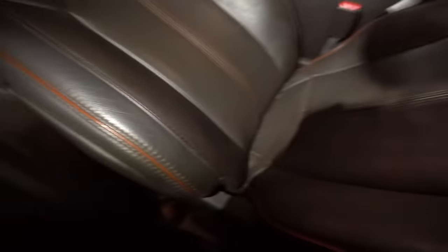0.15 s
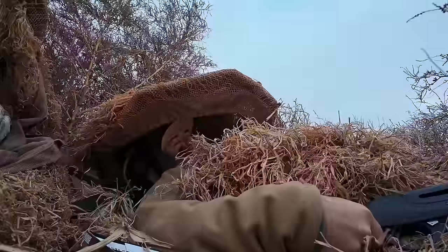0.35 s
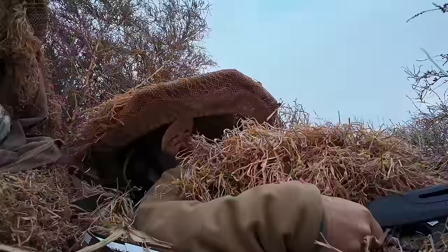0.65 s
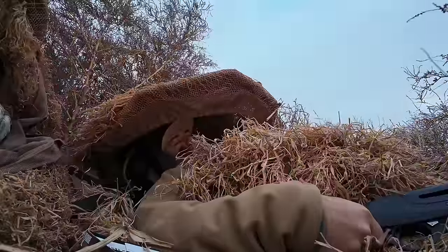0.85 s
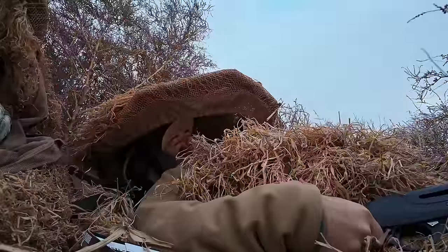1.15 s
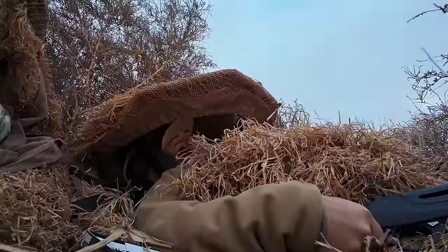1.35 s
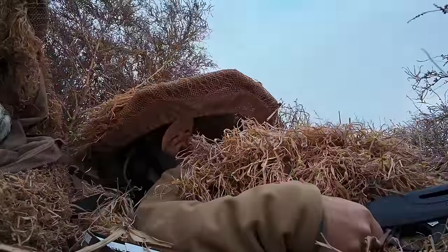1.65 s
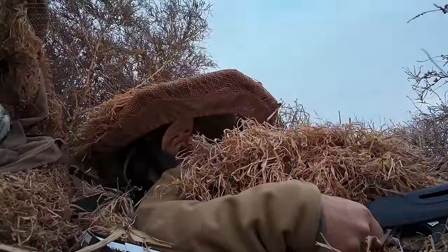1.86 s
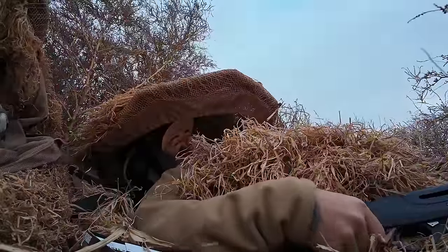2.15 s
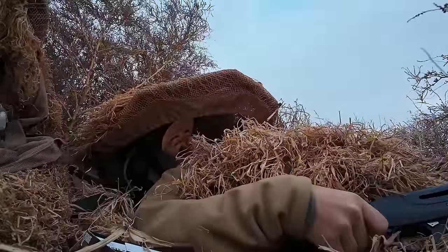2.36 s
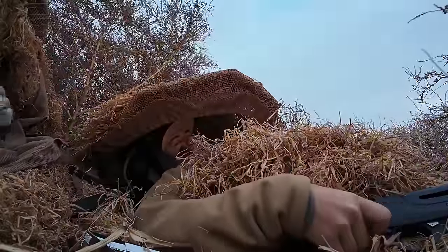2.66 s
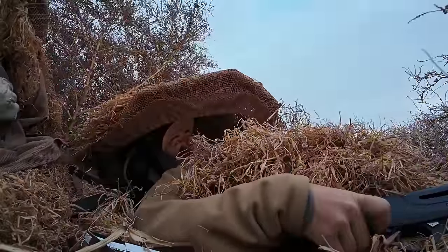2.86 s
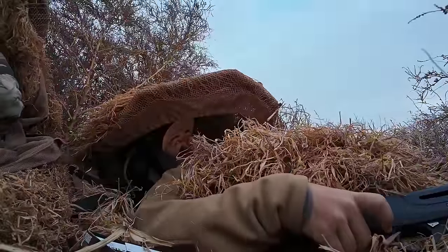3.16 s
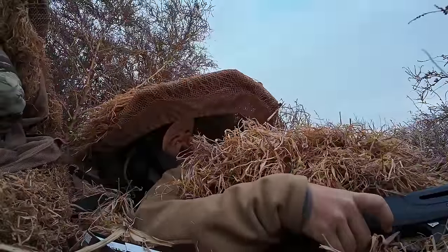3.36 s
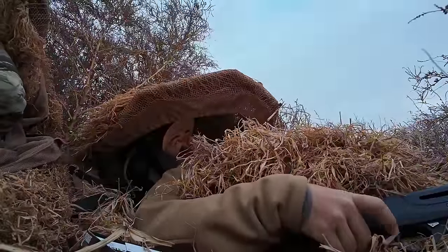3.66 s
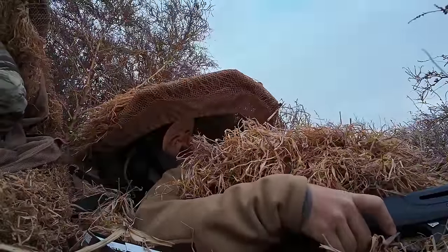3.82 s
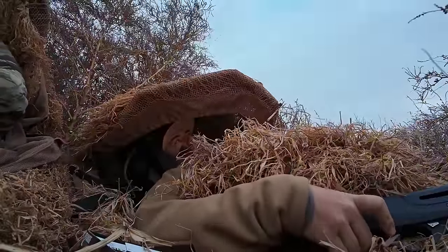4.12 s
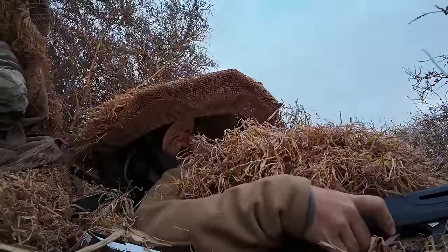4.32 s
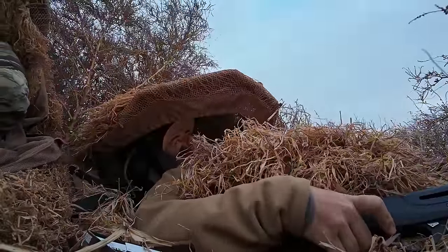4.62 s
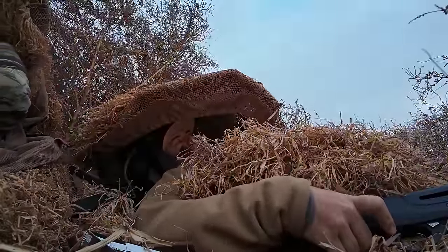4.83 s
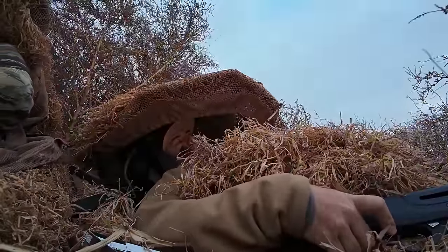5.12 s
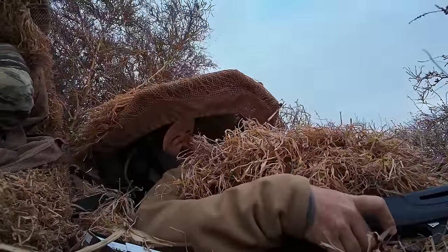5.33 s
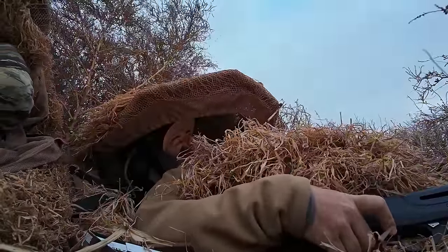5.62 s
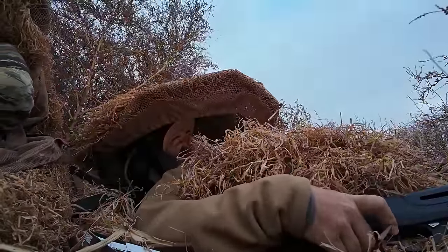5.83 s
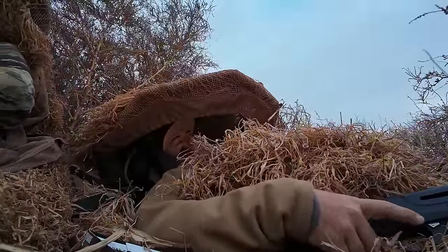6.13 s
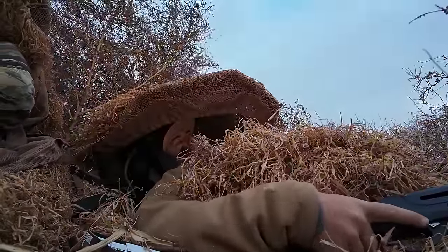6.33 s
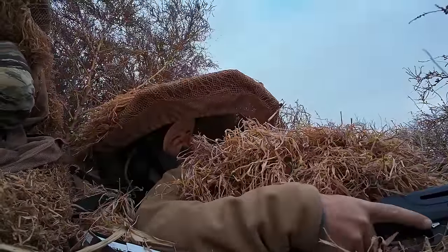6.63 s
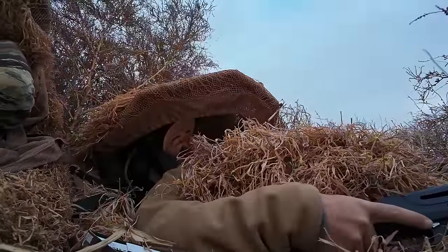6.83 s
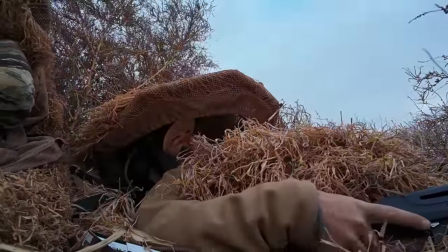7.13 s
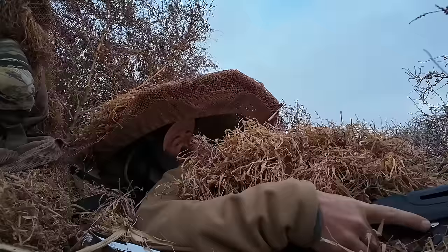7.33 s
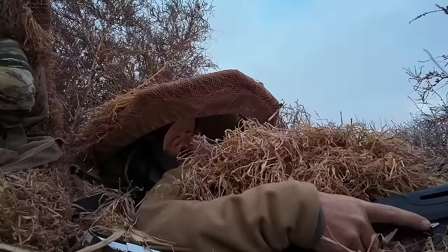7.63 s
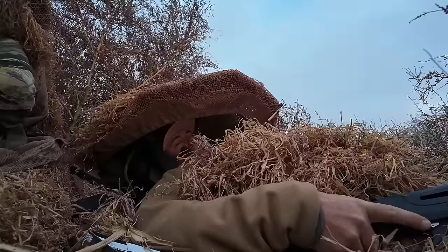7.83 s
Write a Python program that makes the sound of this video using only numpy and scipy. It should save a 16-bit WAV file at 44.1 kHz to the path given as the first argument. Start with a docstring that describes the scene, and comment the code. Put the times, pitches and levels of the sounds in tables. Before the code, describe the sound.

Large cranes rattle and bugle across an open field, with dry straw rustling close by and light wind rumbling on the microphone.

```python
"""Cranes rattle and bugle across an open field, heard from a straw-covered hide in light wind.
A rattle is a string of beats from the windpipe; held bugle notes end calls, and two young birds peep.
Dry straw rubs and snaps close to a two-port microphone, and gusts buffet it over a deep rumble.
The first quarter second is another place, hollow and hissing, with dull thuds; it cuts off abruptly."""
import sys
import numpy as np
from scipy import signal
from scipy.fft import rfft, irfft, next_fast_len
from scipy.io import wavfile
from scipy.ndimage import uniform_filter1d

SR = 44100
rng = np.random.default_rng(int(sys.argv[2]) if len(sys.argv) > 2 else 0)


def put_to_file(sound):
    """Save the sound as 16-bit audio at rate SR, in the file named by the first command-line argument."""
    columns = np.atleast_2d(sound).T  # one column per channel
    safe = np.clip(columns, -1, 1)
    whole_steps = np.round(safe * 32767)
    wavfile.write(sys.argv[1], SR, whole_steps.astype(np.int16))


N = 351918


def gain_of(db):
    """Decibels to an amplitude factor."""
    return 10 ** (np.asarray(db) / 20)


def unit_rms(x):
    """Scales to rms 1."""
    return x / np.sqrt(np.mean(x ** 2) + 1e-20)


def add(mix, start_s, sound):
    """Mixes a sound in from start_s on."""
    part = mix[..., round(start_s * SR):][..., :sound.shape[-1]]
    part += sound[..., :part.shape[-1]]


def filtered(x, hz, kind):
    """Second-order Butterworth filter."""
    return signal.sosfilt(signal.butter(2, hz, kind, fs=SR, output="sos"), x)


def fader(rows, column):
    """One dB column of a timed table as a gain, silent outside its span."""
    rows = np.array(rows)
    return gain_of(np.interp(np.arange(N) / SR, rows[:, 0], rows[:, column], -200, -200))


def stereo_noise(spectrum, frame, patchy_db):
    """Noise of a given spectrum with drifting louder patches, partly alike left and right."""
    # Each row: frequency in Hz, left-right correlation.
    correlation = [(25, 0.94), (150, 0.97), (600, 0.69), (2000, 0.75), (5000, 0.45), (12000, 0.64)]
    hz = np.fft.rfftfreq(frame, 1 / SR)

    def per_bin(rows):
        row_hz, values = np.array(rows).T
        return np.interp(np.log(hz + 1), np.log(row_hz + 1), values)[:, None]

    a, b, c, d, patches = rng.standard_normal((5, len(hz), N * 4 // frame + 5))
    patches = unit_rms(uniform_filter1d(uniform_filter1d(patches, size=10, axis=0), size=8, axis=1))
    alike = np.clip(per_bin(correlation), 0, 1)
    left = a + 1j * b
    right = alike * left + np.sqrt(1 - alike ** 2) * (c + 1j * d)
    in_band = ((hz >= spectrum[0][0]) & (hz <= spectrum[-1][0]))[:, None]
    bins = np.array([left, right]) * in_band * gain_of(per_bin(spectrum) + patchy_db * patches)
    return unit_rms(signal.istft(bins, nperseg=frame, noverlap=frame * 3 // 4)[1][:, :N])


def wind():
    """Deep rumble, gusts on the microphone and the faint wash of the open field."""
    # Each row: time in seconds, rumble level in dB, gust level in dB.
    levels = [(.26, -55, -49), (.82, -56, -54.5), (1.35, -58.5, -51), (1.6, -56.5, -54), (2.2, -56.5, -58),
              (2.4, -50, -44), (2.6, -56, -42.5), (2.87, -59, -46.5), (3, -50.5, -60.5), (3.6, -57, -62),
              (4.6, -54.5, -62.5), (5.3, -57, -56.5), (6.17, -58.5, -55), (6.58, -58, -61),
              (7.98, -55.5, -64)]
    # Each row of these spectra: frequency in Hz, relative density in dB.
    rumble_spectrum = [(8.8, -39), (15, -11.5), (27, 2.5), (53, 6), (102, 0.5), (151, -17.5), (200, -22.5),
                       (260, -54), (440, -120)]
    gust_spectrum = [(35, -45), (60, -11.5), (104, 1.5), (134, 0.5), (167, 5.5), (189, -6.5), (224, -10),
                     (520, -38.5), (680, -103), (1140, -120)]
    wash_spectrum = [(150, -41), (250, 1), (463, -5.5), (873, -6), (3500, -15.5), (7060, -25), (9940, -72),
                     (13300, -55), (15000, -68)]
    rumble = fader(levels, column=1) * stereo_noise(rumble_spectrum, frame=2048, patchy_db=1.0)
    gusts = fader(levels, column=2) * stereo_noise(gust_spectrum, frame=1024, patchy_db=3.0)
    wash = gain_of(-71) * stereo_noise(wash_spectrum, frame=512, patchy_db=3.0)
    return rumble + gusts + wash


def hollow_place():
    """Boom and hiss of an enclosed place, in mono, with dull blows that ring low."""
    # Each row: time in seconds, boom level in dB, hiss level in dB.
    levels = [(0, -34.5, -55), (0.03, -37, -45.5), (0.07, -33.5, -41.5), (0.14, -27.5, -47.5),
              (0.17, -41, -49.5), (0.2, -42.5, -49.5), (0.235, -30.5, -48), (0.257, -33.5, -51.5)]
    # Each row of these spectra: frequency in Hz, relative density in dB.
    boom_spectrum = [(26, -56), (45, -28), (64, -21), (92, -5), (150, -0.5), (270, -6.5), (432, -23),
                     (700, -40), (910, -63), (1540, -120)]
    hiss_spectrum = [(290, -35), (500, -0.5), (587, -3), (978, -0.5), (2560, -7), (6700, -8.5),
                     (11300, -15), (15200, -23), (16300, -40)]
    # Each row: start in seconds, level in dB, pitch in Hz, seconds to fall 60 dB.
    thuds = [(0.042, -17, 118, 0.075), (0.084, -9, 150, 0.049), (0.099, -19.5, 129, 0.15),
             (0.126, -16, 146, 0.064), (0.228, -16, 237, 0.031)]
    out = fader(levels, column=1) * stereo_noise(boom_spectrum, frame=1024, patchy_db=2.5)[0]
    out += fader(levels, column=2) * stereo_noise(hiss_spectrum, frame=256, patchy_db=2.0)[0]
    t = np.arange(8000) / SR
    for start, db, hz, t60 in thuds:
        envelope = gain_of(db - 60 * t / t60) * np.minimum(t / 0.0029, 1)
        add(out, start, envelope * np.sin(2 * np.pi * hz * t))
    cut_off = np.clip((levels[-1][0] * SR - np.arange(N)) / 150, 0, 1)
    return filtered(out, 70, "highpass") * cut_off  # trims deep bass from the thuds and boom


def straw_movement():
    """Gain of the rustle: each movement rises from a faint stirring, lasts a moment and sinks back."""
    # Each row: start in seconds, length in seconds, first and last level in dB.
    rubs = [(0.263, .04, -64.5, -73), (1.768, 0.33, -78.5, -70), (2.091, .17, -69, -57.5),
            (2.575, 0.081, -73, -81), (2.826, 0.15, -75.5, -76), (3.184, 0.023, -77, -76.5),
            (3.4, 0.04, -78, -76), (3.614, 0.015, -77, -83), (4.096, 0.24, -64.5, -67.5),
            (4.43, 0.094, -66, -73), (4.933, 0.32, -65, -76), (6.146, .54, -63.5, -66),
            (6.912, 0.31, -66.5, -63.5), (7.438, 0.25, -71, -65.5), (7.95, .03, -80, -72)]
    # Each row: time in seconds, level between movements in dB.
    stirring = [(.26, -74.5), (.97, -89), (4, -86), (4.6, -80.5), (6, -81), (7.98, -74)]
    rise_s, fall_s = 0.071, 0.17
    t = np.arange(0, N, 64) / SR
    moving_db = -200
    for start, length, db0, db1 in rubs:
        corners = [start - rise_s, start, start + length, start + length + fall_s]
        moving_db = np.maximum(moving_db, np.interp(t, corners, [-90, db0, db1, -90], -200, -200))
    return np.maximum(fader(stirring, column=1), np.interp(np.arange(N) / SR, t, gain_of(moving_db)))


def straw_rustle():
    """Stalks rub close to the microphone: a hiss broken up by many tiny crackles."""
    # Each row: frequency in Hz, relative density in dB.
    spectrum = [(290, -51), (500, -33), (815, 5), (901, -3), (1990, -6.5), (2800, -0.5), (4640, 0.5),
                (7030, -4), (9930, 6.5), (13400, -2), (15500, -27)]
    crackles_per_s, spread_db = 150, 3.0
    strength = gain_of(spread_db * np.minimum(rng.exponential(1, N), 5))
    crackles = strength * (rng.random(N) < crackles_per_s / SR)
    grain = 1 + .7 * signal.lfilter([1], [1, -.97], crackles)  # each lifts the hiss for about 1 ms
    hiss = unit_rms(grain * stereo_noise(spectrum, frame=256, patchy_db=2.0))
    return straw_movement() * gain_of(4.0) * hiss


def clicks_and_snaps():
    """Straw snaps, a few longer-ringing knocks and one click in the opening place,
    each a fast-dying band of noise."""
    # Each row: start in seconds, level in dB, band frequency in Hz, seconds to fall 60 dB.
    clicks = [(0.027, -34, 1270, 0.029), (.268, -34.5, 1530, 0.042), (0.298, -49, 2500, 0.016),
              (1.273, -37, 3620, 0.1), (1.416, -55, 3900, 0.017), (1.529, -43.5, 3660, .05),
              (1.8003, -48.5, 8040, 0.0059), (1.8339, -46, 4400, 0.0056), (1.967, -60, 9000, 0.0065),
              (2.8524, -35, 5940, 0.0026), (3.2264, -51, 10300, 0.0091), (4.338, -45, 6030, 0.006),
              (4.3973, -53, 4570, .006), (4.426, -53, 9500, .0065), (5.0865, -50, 10400, .006),
              (5.1223, -46, 4480, 0.0071), (5.187, -49, 3980, 0.016), (6.213, -31.5, 8650, 0.009),
              (6.294, -37, 10100, .0064), (6.8626, -49, 9900, .006), (6.89, -46, 9100, 0.0028),
              (6.9623, -36, 10600, 0.014), (7.185, -37, 9300, 0.0072), (7.5642, -58, 9000, .006),
              (7.64, -22, 10100, 0.0045), (7.711, -38.5, 8900, 0.0032), (7.7625, -42, 10000, 0.0022),
              (7.8087, -47.5, 3200, 0.012), (7.908, -49, 1760, 0.011)]
    out = np.zeros(N)
    t = np.arange(2500) / SR
    for start, db, hz, t60 in clicks:
        band = filtered(rng.standard_normal(len(t)), [0.54 * hz, min(1.32 * hz, 13500)], "bandpass")
        click = band * gain_of(-60 * t / np.clip(t60, .003, .12)) * np.minimum(t / 0.00057, 1)
        add(out, start, gain_of(db - 2.5) * click / abs(click).max())
    return out


def note_times(first, last, count):
    """Pairs of start time and progress (0 to 1) through a call; the gaps widen near the end."""
    along = np.linspace(0, 1, round(count))
    slowing = 0.04 * (along - along ** 3.5)
    return zip(first + (last - first) * (along - slowing), along)


def peep(length, start_hz, end_hz, db):
    """A young bird's trembling whistle with a weak tail, which flicks upward if the whistle rises."""
    tail_s, tail_db = .008, -11
    t = np.arange(0, length + tail_s, 1 / SR)
    tail = np.clip((t - length) / 0.00093, 0, 1)
    glide = start_hz + (end_hz - start_hz) * np.minimum(t / length, 1)
    tremble = 170 * np.sin(2 * np.pi * 140 * t)
    hz = glide + tremble + max(end_hz - start_hz, 0) * tail
    envelope = gain_of(db + tail_db * tail) * signal.windows.tukey(len(t), .3)
    return envelope * np.sin(2 * np.pi * np.cumsum(hz) / SR)


def trill(first, last, count, low_hz, high_hz, db0, db1, length):
    """Rising peeps that grow louder and end on a narrower sweep, none quite like the next."""
    narrowing, uneven_hz, uneven_db = 0.59, 50, 1.5
    for start, along in note_times(first, last, count):
        inward_hz = (high_hz - low_hz) / 2 * narrowing * along ** 8.3
        start_hz = rng.normal(low_hz + inward_hz, uneven_hz)
        end_hz = rng.normal(high_hz - inward_hz, uneven_hz)
        db = rng.normal(db0 + (db1 - db0) * along ** 1.1, uneven_db)
        yield start, peep(length, start_hz, end_hz, db)


def crane_voice(hz, harmonics_db, rough, fall_db):
    """A stack of harmonics; roughness shakes the pitch and makes each harmonic flutter."""
    levels_db = [0, *harmonics_db] + [harmonics_db[-1] - fall_db * k for k in range(1, 5)]
    numbers = np.arange(1, len(levels_db) + 1)
    for peak_hz, peak_db in ((3750, 2.7), (4708, 11)):  # overtones near these pitches stand out
        levels_db = levels_db + peak_db * np.exp(-((numbers * hz[0] - peak_hz) / 240) ** 2)
    jitter = rng.standard_normal((len(numbers) + 1, len(hz)))
    drift, *flutters = unit_rms(uniform_filter1d(jitter, size=70, axis=1))
    phase = 2 * np.pi * np.cumsum(hz * (1 + 0.079 * rough * drift)) / SR
    offsets = 2 * np.pi * rng.random(len(numbers))
    return sum(np.sqrt(2) * gain_of(db) * (1 - rough / 2 + rough * flutter) * np.cos(k * phase + offset)
               for k, db, flutter, offset in zip(numbers, levels_db, flutters, offsets))


def bugle(length, start_hz, end_hz, db, *harmonics_db):
    """A clean held note that fades as it glides, mostly sagging in pitch."""
    low_hz, doubling, doubling_s = 669, 0.82, 0.021
    hz = np.linspace(start_hz, end_hz, round(length * SR))
    t = np.arange(len(hz)) / SR
    # Low notes are richer and start with strong-weak pulses that even out.
    low = np.clip((low_hz - start_hz) / 8, 0, 1)
    pulses = 1 + low * doubling * np.exp(-t / doubling_s) * np.cos(np.pi * np.cumsum(hz) / SR)
    envelope = gain_of(db + np.linspace(2, -3.5, len(t))) * signal.windows.tukey(len(t), .35)
    tone = crane_voice(hz, harmonics_db, rough=0.15 + 0.073 * low, fall_db=7.5 - 2.94 * low)
    return envelope * pulses * tone


def beat(open_hz, open_db, settled_hz, settled_db, harmonics_db):
    """The windpipe opens with a short burst and a rasp of air, then settles, mostly on a lower pitch."""
    t = np.arange(0, .029, 1 / SR)
    # Bright or far voices are hoarser.
    rough = np.clip(0.34 + 0.014 * harmonics_db[-1] - 0.01 * min(open_db + 48, 0), .08, .8)
    burst = (t / 0.0044) ** 2 * np.exp(2 * (1 - t / 0.0042))
    settle = np.clip((t - .005) / 0.0051, 0, 1) * np.clip((t[-1] - t) / 0.01, 0, 1)
    opening = burst * crane_voice(np.full_like(t, open_hz), harmonics_db, 0.5 * rough, fall_db=9.5)
    settled = settle * crane_voice(np.full_like(t, settled_hz), harmonics_db, rough, fall_db=9.5)
    air = unit_rms(filtered(rng.standard_normal(len(t)), [1200, 2900], "bandpass"))
    breath = 0.28 * gain_of(open_db) * (burst + settle) + gain_of(settled_db) * settle
    rasp = gain_of(max(harmonics_db) - 1) * np.sqrt(rough) * breath * air
    return gain_of(open_db + 2.5) * opening + gain_of(settled_db + 3.5) * settled + rasp


def rattle(first, last, count, open_hz0, open_hz1, open_db0, open_db1,
           settled_hz, settled_db0, settled_db1, second_db0, second_db1, third_db):
    """The beats of one call: the effort changes quickly at first and levels off towards the last."""
    for start, along in note_times(first, last, count):
        open_effort = 1 - (1 - along) ** 2.8
        settled_effort = 1 - (1 - along) ** 1.4
        open_hz = open_hz0 + (open_hz1 - open_hz0) * open_effort
        open_db = open_db0 + (open_db1 - open_db0) * open_effort
        settled_db = settled_db0 + (settled_db1 - settled_db0) * settled_effort
        second_db = second_db0 + (second_db1 - second_db0) * settled_effort
        yield start, beat(open_hz, open_db, settled_hz, settled_db, (second_db, second_db + third_db))


def across_field(calls):
    """Calls reach the hide a touch right of centre, trailed by weak scatter from ground and brush."""
    t60, scatter_db = 0.16, -9.5
    t = np.arange(4000) / SR
    echoes = rng.standard_normal((3, len(t))) * (rng.random((3, len(t))) < .05)
    echoes *= gain_of(-60 * t / t60) * (t > .003)
    response = echoes[0] + 0.21 * echoes[1:]  # mostly common to both channels
    scatter = signal.oaconvolve(calls[None], response / np.linalg.norm(response[0]), axes=1)[:, :N]
    return calls * gain_of([[-.3], [.3]]) + gain_of(scatter_db) * scatter


def cranes():
    """The birds out on the field: rattles and bugles, and the trills of the two young."""
    # Each row: first and last beat in seconds, beat count, first and last opening pitch in Hz,
    # first and last opening level in dB, settled pitch in Hz, first and last settled level in dB,
    # first and last 2nd harmonic in dB, 3rd harmonic relative to the 2nd in dB.
    rattles = [(.2845, .3905, 4, 1050, 1041, -48.5, -49, 936, -63, -58, -8, -8, -13),
               (.6285, .7315, 3, 865, 850, -74, -71, 558, -76, -70, 6, 5, -32),
               (.7715, .8125, 2, 830, 880, -64, -62, 848, -57.5, -57, -13, -13, -9),
               (1.0655, 1.0655, 1, 840, 831, -70, -70, 715, -69, -68, -25, -20, -8),
               (1.0985, 1.2835, 5, 774, 901, -50.5, -43.5, 778, -58, -51.5, -1, -5, -11.5),
               (1.3215, 1.3735, 2, 1194, 1090, -51.5, -51, 963, -64, -58.5, -29, -32, -9),
               (1.5575, 1.6625, 4, 770, 867, -69, -61.5, 642, -79, -70.5, 7.5, 3.5, -16),
               (2.0595, 2.1405, 3, 745, 780, -61.5, -67, 780, -66, -57, -3, -6, -7),
               (2.1765, 2.2215, 3, 878, 856, -52, -52, 826, -57, -60, -9, -8, -13),
               (2.4365, 2.5785, 5, 910, 919, -64.5, -56.5, 900, -95, -66, 3, 2, -10),
               (2.6375, 2.8245, 5, 726, 772, -72, -58.5, 613.5, -78.5, -68, 14, 1, -2),
               (3.3245, 3.5255, 6, 652, 714, -60.5, -52, 592, -69.5, -65, 5, 1.5, -2),
               (3.4205, 3.5505, 4, 830, 870, -53, -49, 856, -59, -55, -9, -7, -10.5),
               (3.586, 3.7585, 6, 745, 757, -58.5, -57.5, 745.4, -56.5, -62, -1.5, -2, -4),
               (3.7965, 3.8625, 3, 540, 630, -67.5, -62, 628, -83, -71, 10.5, 4, -3),
               (3.9145, 4.0115, 3, 816, 819, -56.5, -57.5, 641, -71, -62.5, -7, -1, 1),
               (4.0355, 4.2445, 7, 750, 810, -56.5, -51.5, 738, -66, -56, 5, 2.5, -12),
               (4.4725, 4.5775, 4, 1045, 1055, -67, -59, 1020, -69, -65.5, -15, -10, -10),
               (4.5835, 4.6835, 4, 820, 900, -72.5, -70, 787, -73, -84, 8, 2, -18),
               (5.5605, 5.7475, 5, 825, 888, -60, -48, 778, -57.5, -55.5, -6.5, -5.5, -14.5),
               (6.0515, 6.2695, 7, 1000, 1040, -69, -69.5, 1036, -86, -68.5, -22, -39, -12),
               (7.373, 7.4755, 3, 760, 746, -77, -75, 605, -82, -81, 4, 6.5, -23),
               (7.9705, 7.9705, 1, 770, 774, -68, -64, 675, -59.5, -62.5, 12.5, 13, -10)]
    # Each row: first and last peep in seconds, peep count, low and high pitch in Hz,
    # first and last level in dB, peep length in seconds.
    trills = [(4.125, 4.279, 5, 3420, 3760, -54, -53.5, 0.0147),
              (5.757, 6.008, 8, 3070, 3575, -61.5, -52, 0.0172)]
    # Each row: start and length in seconds, first and last pitch in Hz, level in dB,
    # 2nd and 3rd harmonic relative to the fundamental in dB.
    bugles = [(.405, 0.086, 901, 787, -54.5, -9, -19), (.74, .048, 536, 528, -76, 16.5, -12),
              (.83, 0.022, 815, 890, -57, -25, -30), (.848, .047, 670, 625, -59.5, 1, -15),
              (1.298, 0.097, 796, 754, -48.5, -6.5, -15), (1.392, 0.068, 916, 830, -54.5, -17, -36),
              (1.675, 0.023, 680, 658, -67, 13, 5), (2.22, 0.045, 737, 720, -55.5, -8.5, -14),
              (2.235, 0.059, 865, 817, -52, -12, -26), (2.292, 0.035, 610, 620, -63.5, 0.5, -15),
              (2.845, 0.07, 616, 596, -63.5, 6, 2.5), (3.485, 0.095, 860, 856, -59, -2, -31),
              (3.565, 0.063, 842, 821, -52.5, -10.5, -25), (3.586, .1, 742, 741, -58, -7, -1.5),
              (3.845, 0.053, 720, 683, -69, 5.5, 5.5), (4.03, .11, 638, 584, -62, 5, 6),
              (4.262, 0.07, 727, 706, -61.5, 5, -5), (4.28, 0.052, 565, 532, -65, 3.5, 6.5),
              (4.6, 0.068, 890, 879, -68.5, -9, -16), (4.662, 0.08, 1095, 1020, -68, -30, -24),
              (5.762, 0.063, 782, 745, -55, -2.5, -17), (5.82, 0.033, 574, 560, -68.5, 1.5, -6),
              (7.438, 0.015, 1240, 1260, -66, -20, -30), (7.482, .028, 1190, 1190, -69, -20, -30)]
    # A falling peep closes each trill.
    # Each row: start and length in seconds, first and last pitch in Hz, level in dB.
    closing_peeps = [(4.321, 0.041, 3680, 3340, -62), (6.049, 0.032, 3150, 3090, -58.5)]
    calls = np.zeros(N)
    for table, call in ((rattles, rattle), (trills, trill)):
        for row in table:
            for start, sound in call(*row):
                add(calls, start, sound)
    for table, note in ((bugles, bugle), (closing_peeps, peep)):
        for start, *row in table:
            add(calls, start, note(*row))
    return across_field(calls)


def microphone_ports(x):
    """Two ports side by side: treble reaches the left one later."""
    one_radian_hz = 7520
    size = next_fast_len(N)
    lag = (np.fft.rfftfreq(size, 1 / SR) / one_radian_hz) ** 2
    return irfft(rfft(x, size) * np.exp(.5j * lag * np.array([[-1], [1]])), size)[:, :N]


def scene():
    """The field as heard from the hide, after a moment in the hollow place."""
    return microphone_ports(cranes() + wind() + straw_rustle() + clicks_and_snaps()) + hollow_place()


def record(dry):
    """The recorder's band limit cuts the highest treble."""
    edge_hz = 16300
    lowpass = signal.firwin(511, edge_hz, window=("kaiser", 9), fs=SR)
    return signal.oaconvolve(dry, lowpass[None], "same")


dry = scene()
out = record(dry)
put_to_file(out)
```